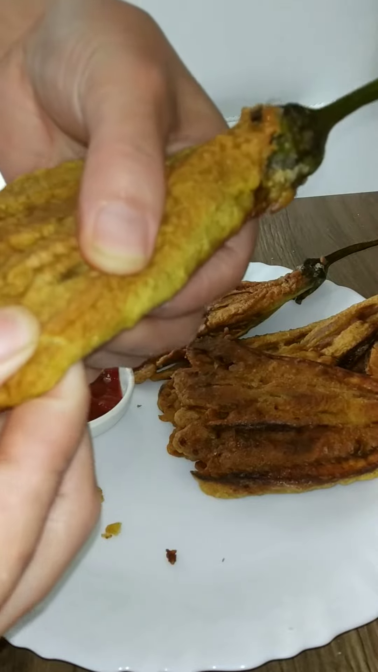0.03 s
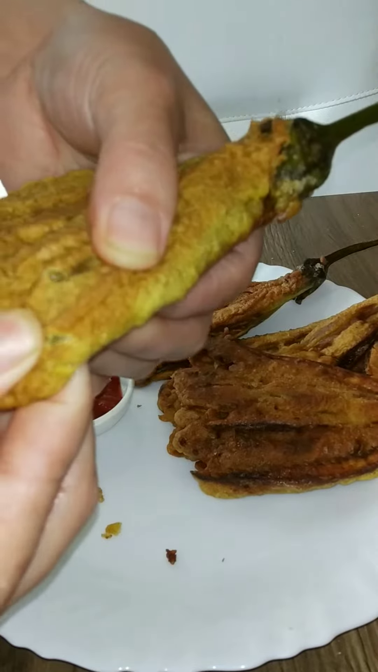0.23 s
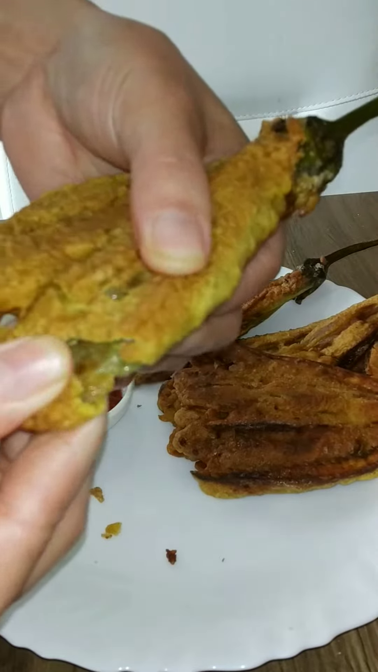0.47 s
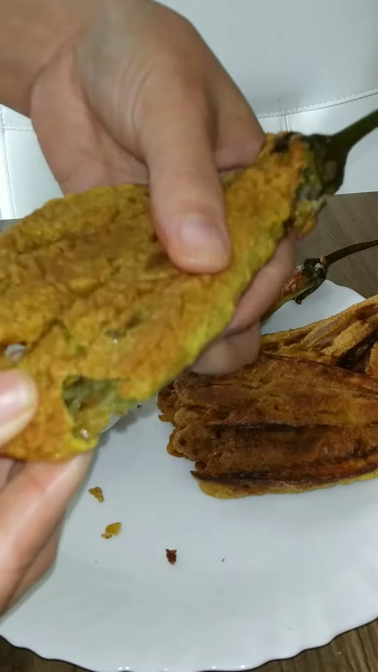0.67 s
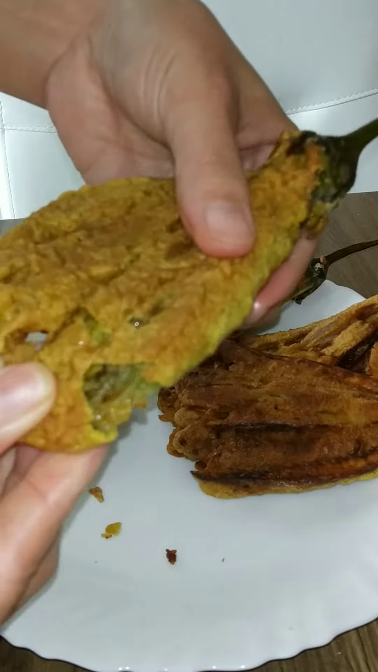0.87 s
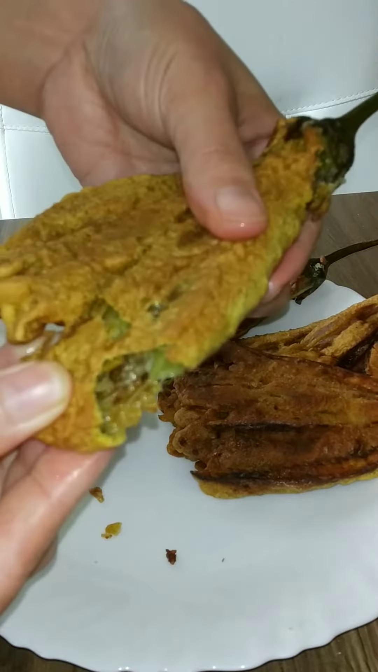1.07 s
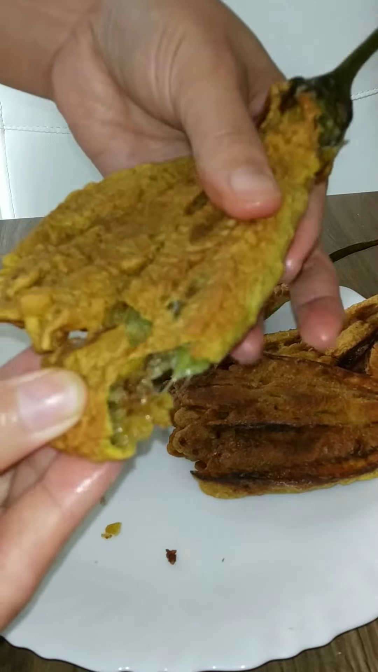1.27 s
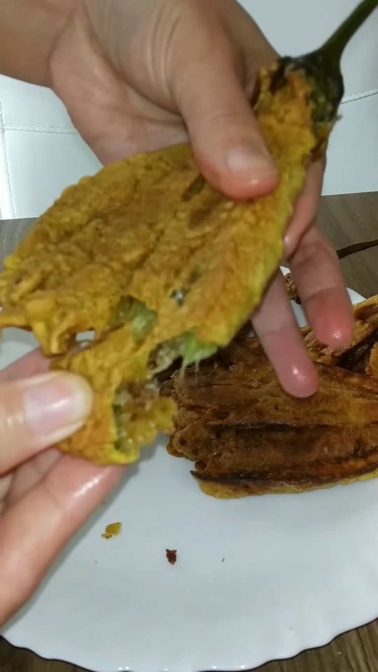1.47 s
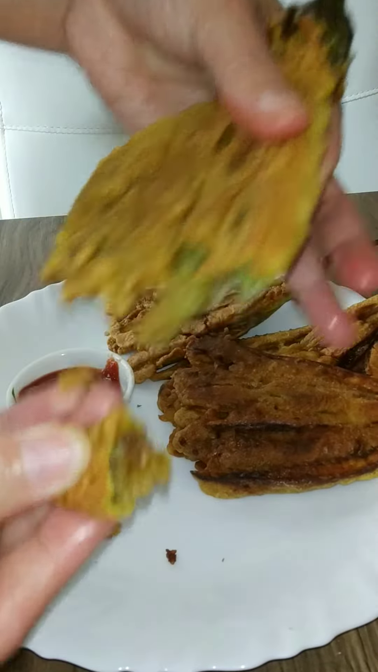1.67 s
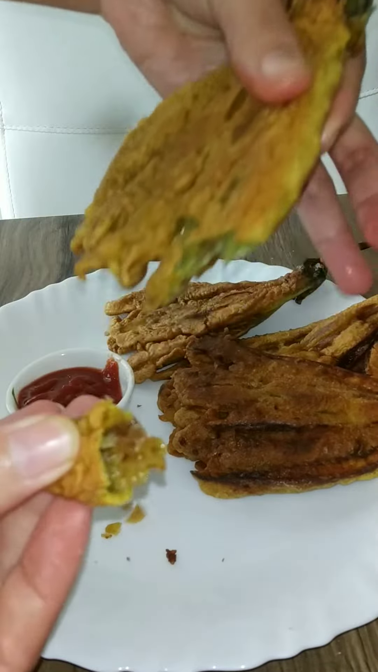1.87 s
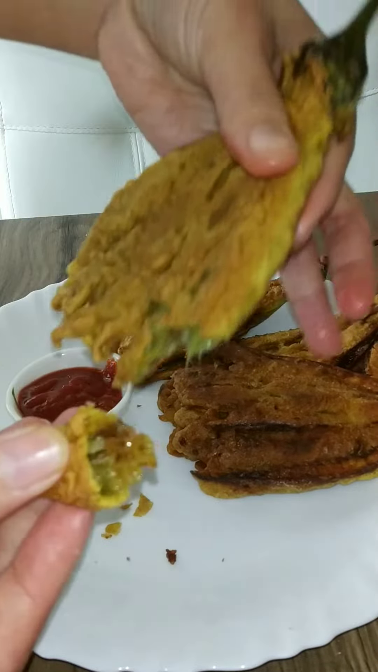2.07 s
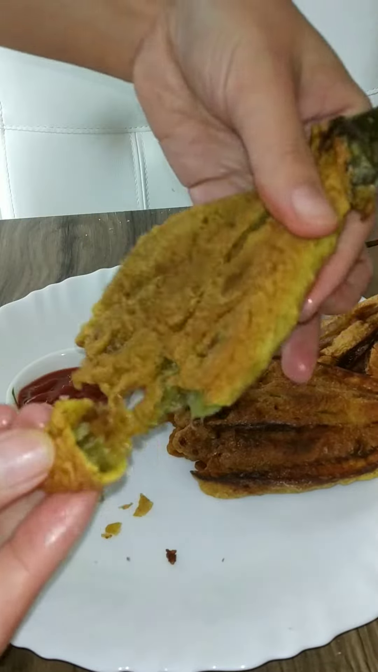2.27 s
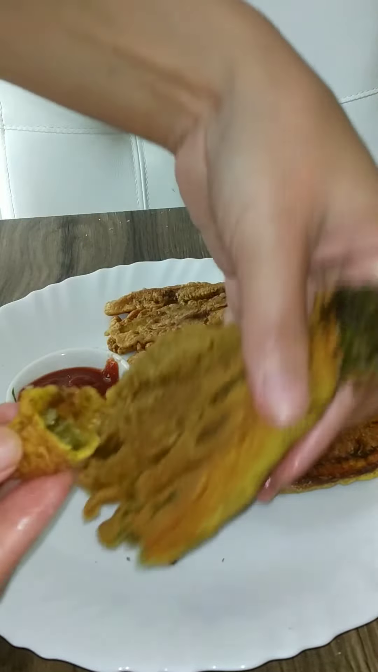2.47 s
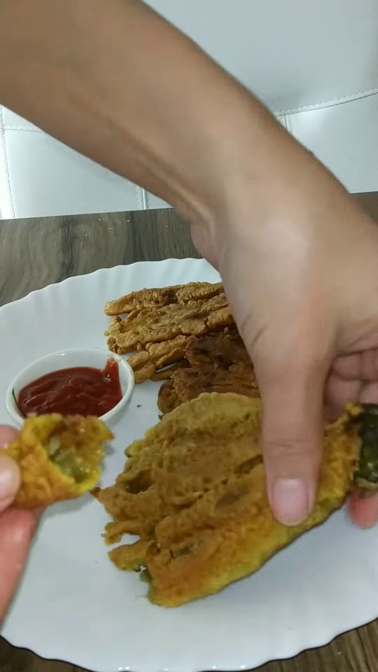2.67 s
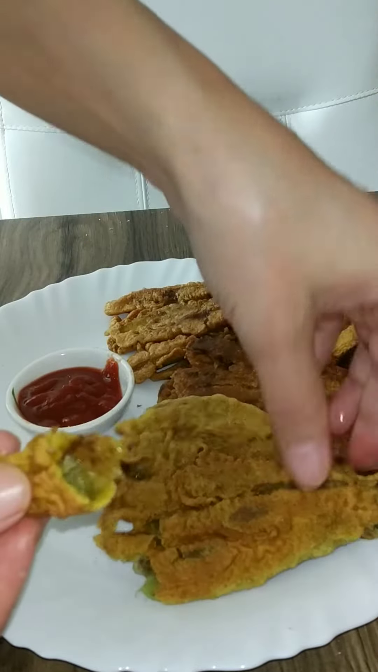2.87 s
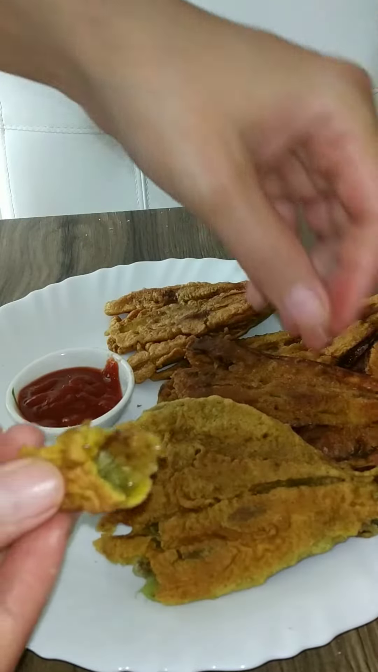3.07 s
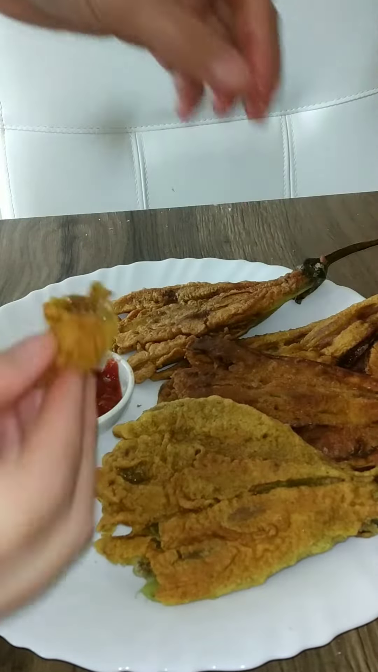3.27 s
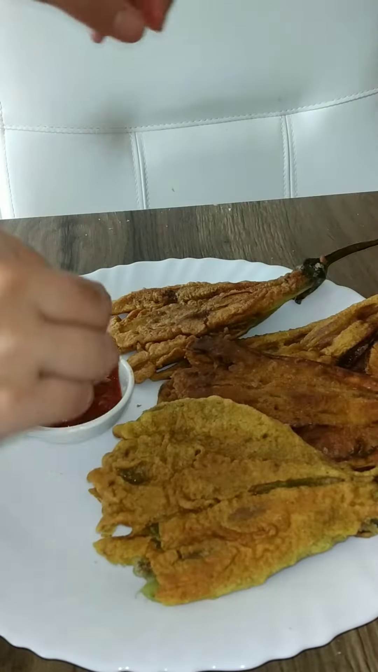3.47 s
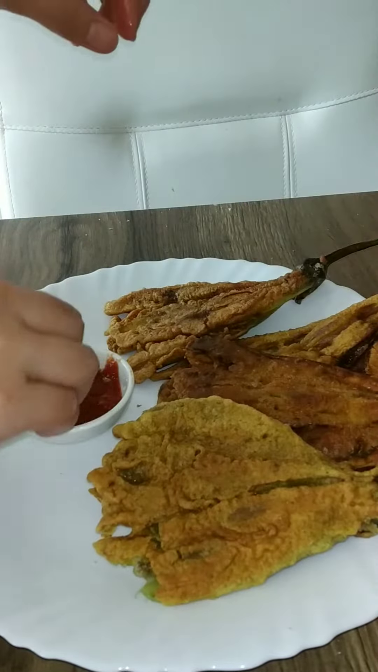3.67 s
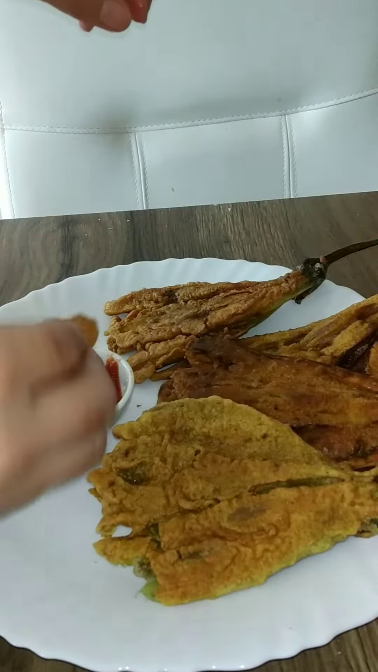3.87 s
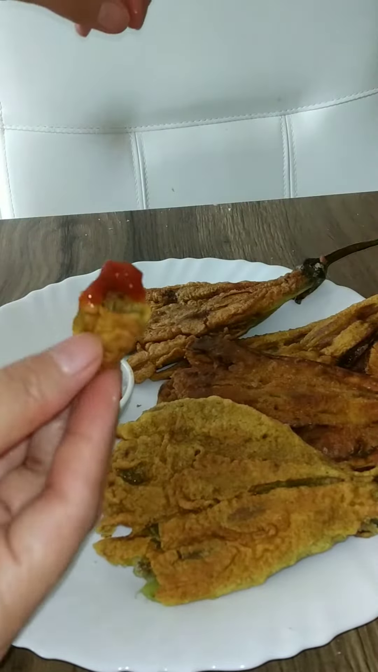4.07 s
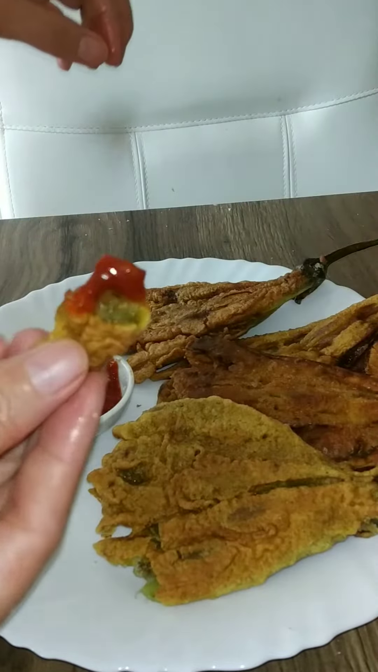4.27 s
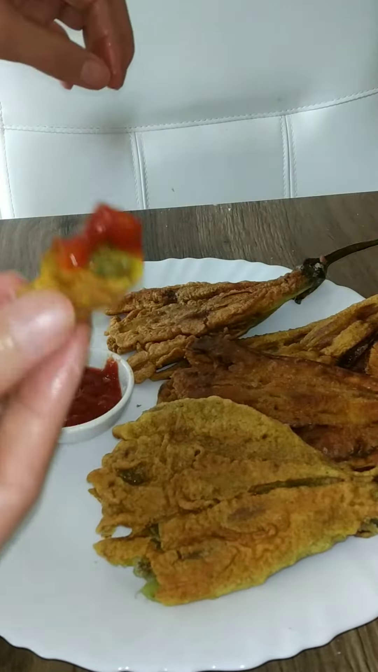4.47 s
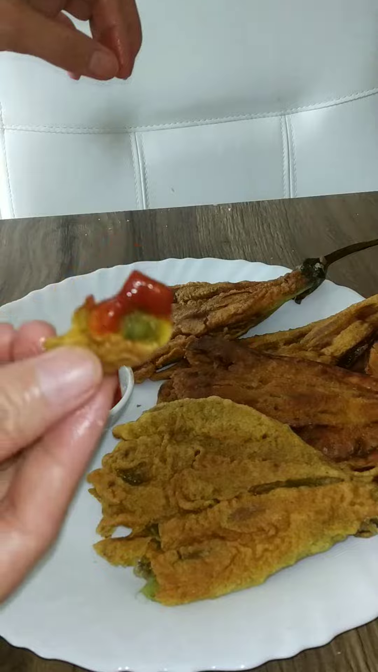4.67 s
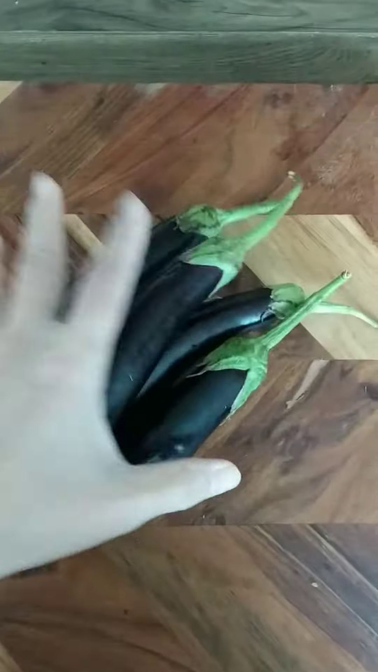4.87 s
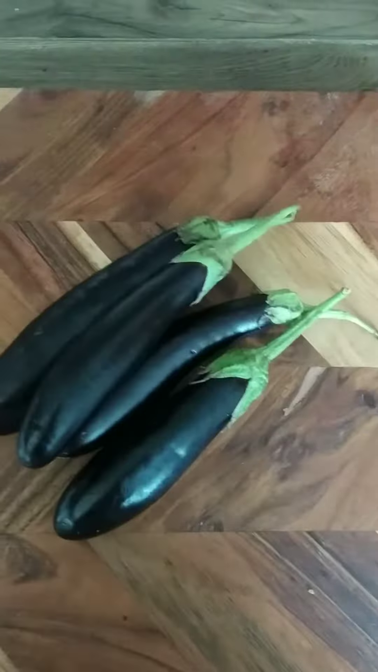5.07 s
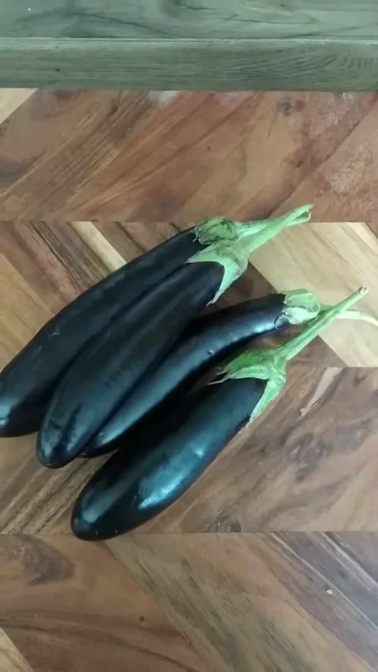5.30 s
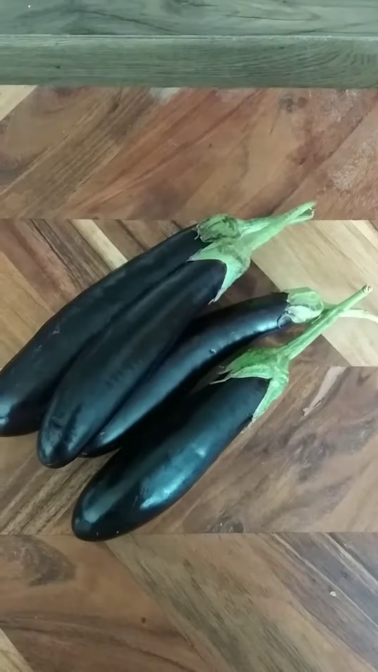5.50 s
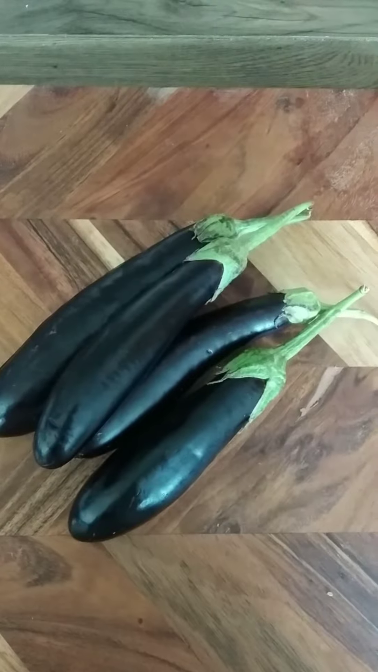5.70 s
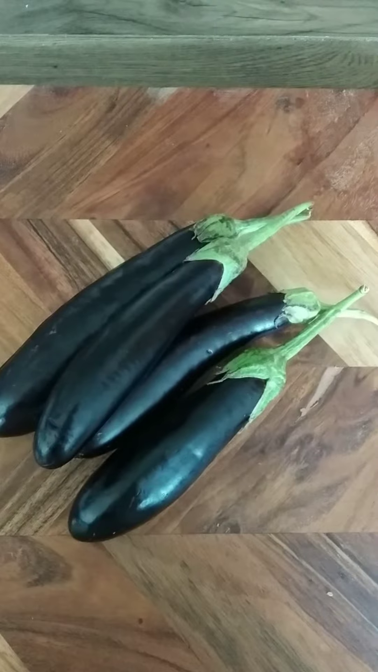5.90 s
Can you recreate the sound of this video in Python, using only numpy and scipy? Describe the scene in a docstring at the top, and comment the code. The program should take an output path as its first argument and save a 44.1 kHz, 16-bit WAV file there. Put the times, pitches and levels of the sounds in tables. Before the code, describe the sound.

Crispy fried food is torn by hand with small sharp crackles, then raw eggplants drop onto a wooden board with a loud knock.

```python
"""Fingers tear a batter-fried eggplant close to a phone: the crust breaks in sharp snaps over a rustle
of tiny fractures. Crumbs and the piece tick on a china plate, ringing its thin modes, and the piece is
laid down with soft thuds. Then raw eggplants drop on a wooden board, knocking and slapping as they
settle. A room hums below the microphone hiss."""
import sys
import numpy as np
from scipy import signal
from scipy.fft import rfft, irfft
from scipy.io import wavfile
from scipy.ndimage import uniform_filter1d

SR = 44100
rng = np.random.default_rng(int(sys.argv[2]) if len(sys.argv) > 2 else 0)


def generate_wav(signal):
    """Clip the signal to [-1, 1] and save it as 16-bit WAV at the path in sys.argv[1]."""
    frames = np.transpose(np.atleast_2d(signal))
    scaled = np.clip(frames, -1, 1) * 32767
    pcm = np.round(scaled).astype(np.int16)
    wavfile.write(sys.argv[1], SR, pcm)


N = 261954


def undb(db):
    """Decibels to gain."""
    return 10 ** (np.asarray(db) / 20)


def along(points, hz):
    """Read a curve of (hz, value) points on a log-frequency axis."""
    freqs, values = np.transpose(points)
    return np.interp(np.log(np.maximum(hz, 1)), np.log(freqs), values)


def colour(x, gain):
    """EQ by a gain that is a function of frequency."""
    n = x.shape[-1]
    return irfft(rfft(x) * gain(np.arange(n // 2 + 1) * SR / n), n)


def unit(x):
    """Scale to rms 1."""
    return x / np.sqrt(np.mean(x ** 2))


def add(out, start_s, piece):
    """Mix a stereo piece in at its start time."""
    i = int(start_s * SR)
    out[:, i:i + piece.shape[1]] += piece[:, :N - i]


def stereo_noise(n, correlation):
    """White noise, partly shared by left and right."""
    shared, apart = rng.standard_normal((2, n))
    return np.array([correlation * shared + np.sqrt(1 - correlation ** 2) * apart, shared])


def pan(db):
    """Left and right gains; positive db leans left."""
    return undb(np.array([[db], [-db]]) / 2)


def fade(t, t60):
    """Exponential decay, 60 dB down at t60."""
    return np.exp(-np.log(1000) * t / np.maximum(t60, .002))


def wander(rate_hz):
    """Slow random drift of rms 1."""
    hold = int(SR / rate_hz)
    steps = np.repeat(rng.standard_normal(N // hold + 1), hold)
    return unit(uniform_filter1d(uniform_filter1d(steps, hold), hold)[:N])


# Tone of the room hum: freq_hz, level_db
HUM_EQ = [(12, -39), (20, 2), (49, 1.5), (81, -11), (124, -10), (155, -13), (190, -4.5), (228, -16.5),
          (285, -12), (350, -20), (527, -19), (623, -25), (710, -20), (1130, -21), (1700, -38.5),
          (2210, -88), (3740, -120)]
# Stereo image of the hum: freq_hz, left_right_correlation
HUM_CORRELATION = [(60, 0.69), (130, 0.96), (290, 0.85), (640, 0.68), (1400, 0.077)]
# Level of the hum's upper band, which sinks after 4.6 s: time_s, level_db
UPPER_HUM_LEVEL = [(0, -53), (4.6, -53.5), (5.4, -57.5), (5.94, -58)]


def room_hum():
    """Low room noise, nearly mono in the bass; the rumble and the upper band waver separately."""
    t = np.arange(N) / SR
    shared, apart = rng.standard_normal((2, N))
    correlation = lambda f: along(HUM_CORRELATION, f)
    left = colour(shared, correlation) + colour(apart, lambda f: np.sqrt(1 - correlation(f) ** 2))
    hum = colour(np.array([left, shared]), lambda f: undb(along(HUM_EQ, f)))
    hum /= colour(hum, lambda f: (f > 30) & (f < 120)).std()  # the bass sets the level
    low = colour(hum, lambda f: 1 / (1 + (f / 400) ** 2))
    rumble = low * undb(-55 + 1.5 * wander(rate_hz=5))
    upper_db = np.interp(t, *np.transpose(UPPER_HUM_LEVEL))
    upper = (hum - low) * undb(upper_db + .6 * wander(rate_hz=6))
    return rumble + upper


def flesh(f):
    """Gain of the soft body under the crust: a broad resonance near 2 kHz."""
    bump = np.exp(-(np.log2(np.maximum(f, 1) / 2000) / 1.03) ** 2)
    return bump * (f / 1000) ** 4 / (1 + (f / 1000) ** 4)


# Tone of breaking crust, also used by the cracks and ticks: freq_hz, level_db
CRUST_EQ = [(800, 7), (1500, -16.5), (3000, -13.5), (5000, -6), (8000, -3), (12000, -2.5), (16000, -5)]
# Swells of crumbling; the last two are stems brushing the board:
# peak_s, level_db, t60_s, treble_tilt_db, body_db
RUSTLE_SWELLS = [(0.02, -48, 0.34, 2, -24), (0.255, -68, 0.21, 5, -15), (0.345, -56, 0.52, 19, -22),
                 (0.535, -49.5, 0.16, 10, -11), (0.68, -55.5, 0.14, 7, -3), (1.245, -61.5, 0.49, 11, -11),
                 (1.633, -44.5, 0.21, 0, -18), (1.8, -58.5, 0.87, 0, -9), (2.619, -57, 0.17, -18, -2),
                 (2.712, -52.5, 0.4, -5, -8), (2.885, -60, 0.32, -14, 3), (2.93, -61, 0.53, 3, -26),
                 (4.745, -57.5, 0.55, 12, -5), (4.9, -56, 0.15, 3, 1.5)]


def crust_rustle():
    """Dense tiny fractures of uneven size, dull or bright by the swell, with the soft body's scrape."""
    t = np.arange(N) / SR
    fractures_per_s, rise_to_fall = 1500, 0.68
    sizes = (rng.random(N) < fractures_per_s / SR) * undb(np.minimum(22 * rng.exponential(size=N), 12))
    energy = signal.lfilter([1], [1, -fade(2 / SR, t60=0.025)], sizes ** 2)  # a short tail on each
    grains = stereo_noise(N, correlation=0.12) * np.sqrt(energy)
    crunch = unit(colour(grains, lambda f: undb(along(CRUST_EQ, f))))
    dull = colour(crunch, lambda f: 1 / (1 + (f / 7000) ** 4))
    bright = crunch - dull
    body = unit(colour(grains, flesh))

    def blend(tilt_db, body_db):
        return dull * undb(-tilt_db / 2) + bright * undb(tilt_db / 2) + body * undb(body_db)

    pulling = (1 - np.tanh((t - 1.6) / 0.066)) / 2  # a faint bed while the hands pull, until 1.6 s
    out = undb(-71) * blend(tilt_db=11, body_db=-6) * pulling
    for peak_s, level_db, t60, tilt_db, body_db in RUSTLE_SWELLS:
        swell = fade(abs(t - peak_s), np.where(t < peak_s, rise_to_fall * t60, t60))
        out += undb(level_db) * swell * blend(tilt_db, body_db)
    return out * pan(-1.3)


# Snaps of the crust; the last is a dry stem: start_s, level_db, flake_hz, pan_db, body_db
CRACK_CUES = [(0.0207, -25, 12000, -4.5, 0), (0.0332, -31.5, 7050, -1, -5), (0.142, -46.5, 10800, 6, -25),
              (0.163, -49, 7540, -1, -18), (0.2425, -44, 14300, 9, -33), (0.2515, -40.5, 5830, -4, -5),
              (0.269, -42, 12700, -4, -9), (0.281, -52, 12800, 5, -10), (0.2966, -50, 5950, 3, 6),
              (0.313, -45, 7810, -2, -21), (0.318, -39, 12300, 6, -28), (0.3234, -33, 8340, 0, -32),
              (0.345, -38, 10400, -11, -10), (0.3543, -27, 12100, 0.5, -0.5), (0.373, -44, 12000, 7, 5),
              (0.5106, -40, 10600, -12, -30), (0.5127, -28, 10600, -13.5, -24),
              (0.5263, -36.5, 12800, -8, -15), (0.5324, -40, 9440, -12, -12), (0.547, -43, 10800, -15, -2),
              (0.681, -47.5, 12200, 3, -3), (0.6868, -48, 11400, -21, -25), (0.6996, -42, 9000, -3, -1),
              (0.9342, -47.5, 8100, -2, 4), (0.953, -51.5, 10500, -8, -20), (0.9924, -25.5, 12100, -3, -30),
              (1.0218, -34.5, 15000, -3, -7), (1.0249, -23.5, 13500, -5, -9), (1.0333, -33, 11400, -2, -11),
              (1.0937, -41.5, 11800, -6, -12), (1.187, -46.5, 14700, -2.5, -2),
              (1.2293, -33.5, 11900, -2, -17), (1.234, -38, 12800, -6, -12), (1.263, -43, 11800, 1, -12),
              (1.288, -35, 12700, 0, -19), (1.291, -35.5, 12600, -9, -30), (1.518, -48, 13000, -6, -7),
              (1.5403, -47.5, 12500, -5, -2), (1.6225, -40.5, 13700, -4, 0), (1.6311, -43.5, 7900, -3, -5),
              (1.636, -45.5, 4220, -9, -15), (2.5569, -44.5, 12800, -6, -4), (2.6, -43, 14000, -4, -3),
              (2.61, -49, 9900, 1, -6), (2.6223, -50, 4160, 2, 14.5), (2.7173, -46, 4170, -9, -15),
              (2.831, -43, 9200, -1, -9), (5.036, -47.5, 5240, 2, 2)]


def crust_cracks():
    """Each fracture is a sharp snap with a ragged trail; it rings the freed flake and the soft body."""
    out, t = np.zeros((2, N)), np.arange(4096) / SR
    lead_s = 256 / SR
    attack = np.exp(np.minimum(t - lead_s, 0) / .0005)
    since_break = np.maximum(t - lead_s, 0)
    snap, trail = fade(since_break, t60=0.0049), undb(-8.5) * fade(since_break, t60=0.034)
    hollow = lambda f: undb(8) * np.exp(-((f - 1200) / 150) ** 2)  # the cavity under the crust
    low_cut = lambda f: f ** 4 / (f ** 4 + 970.0 ** 4)
    for start_s, level_db, flake_hz, pan_db, body_db in CRACK_CUES:
        burst = stereo_noise(len(t), correlation=0.49) * attack * (snap + trail)
        burst[:, int(lead_s * SR)] += undb(13.5)  # the instant of the break
        peak = lambda f: 0.9 / (1 + ((f - flake_hz) / (0.19 * flake_hz)) ** 2)
        flake = lambda f: undb(along(CRUST_EQ, f)) * (0.31 + peak(f))
        flake_rms = np.sqrt(np.mean(flake(np.linspace(3000, 16000, 50)) ** 2))
        body = lambda f: undb(body_db) * (flesh(f) + hollow(f))
        crack = colour(burst, lambda f: (flake(f) / flake_rms + body(f)) * low_cut(f))
        add(out, start_s - lead_s, crack * undb(level_db) * pan(pan_db))
    return out


# Ring of the china: pitch_hz, rim_level_db, t60_s, middle_change_db
CHINA_MODES = [(1960, -2, 0.021, 2), (2870, -14.5, 0.17, -9), (4170, -23, 0.13, 17.5),
               (4500, -20, 0.072, 3), (5250, 5, 0.048, -15), (6000, -14, 0.08, 3), (6630, -9, 0.051, -1),
               (7480, -1.5, 0.074, -12), (7530, -18, 0.15, 6), (8070, -7, 0.089, -2), (8460, -15, 0.13, 0),
               (9330, -4, 0.072, -5), (9840, -3, 0.11, -2), (10400, -17, 0.065, 0), (10830, -2, 0.071, 6),
               (11510, -15, 0.1, 4), (12010, -12, 0.13, 7), (12300, -13, 0.08, 13), (13290, -1.5, .07, -12),
               (14290, -14, .07, 8), (14670, -7, .06, -10), (15100, -16, .08, 4)]
# Hits on the plate: hit_s, level_db, pan_db, place (0 rim, 1 middle)
TICK_CUES = [(1.76, -47, -5, 0.9), (1.807, -34, 0, 0.85), (2.8968, -22, -1.5, 0.05)]


def plate_ticks():
    """Hard crust strikes china: a crack, then the round plate's modes, in close pairs that beat."""
    out, t = np.zeros((2, N)), np.arange(SR // 3) / SR
    twin_ratio = 1.0072
    attack = np.minimum(t / 0.0039, 1)
    for hit_s, level_db, pan_db, place in TICK_CUES:
        ring = 0
        for hz, rim_db, t60, middle_db in CHINA_MODES:
            phase = rng.uniform(0, 2 * np.pi) + 0.83 * rng.standard_normal((2, 1))
            spread_db = 1.4 * rng.standard_normal((2, 1))
            mode = np.sin(2 * np.pi * hz * t + phase)
            twin = 0.66 * np.sin(2 * np.pi * hz * twin_ratio * t + 2 * phase)
            ring += undb(rim_db + place * middle_db + spread_db) * fade(t, t60) * (mode + twin)
        noise = stereo_noise(len(t), correlation=0.067)
        crack = colour(noise, lambda f: undb(0.23 * along(CRUST_EQ, f))) * fade(t, t60=0.025)
        tick = (undb(-10.5) * ring + undb(1.5) * crack) * attack
        add(out, hit_s - .002, tick * undb(level_db) * pan(pan_db))
    return out


# Low ring of the plate on the table: pitch_hz, level_db, t60_s
THUD_MODES = [(54.7, -2, 0.14), (104, 0, 0.093), (385, 6, 0.031), (440, 3, 0.017)]
# The piece is laid down: start_s, level_db, bass_boost_db
THUD_CUES = [(2.913, -50.5, 5.5), (2.949, -45.5, 4), (2.982, -38.5, -2)]


def plate_thuds():
    """The piece lands softly and stirs only the low modes of the plate on the table."""
    out, t = np.zeros((2, N)), np.arange(SR // 3) / SR
    attack = np.minimum(t / 0.0013, 1)
    for start_s, level_db, bass_db in THUD_CUES:
        thud = sum(undb(mode_db + bass_db * (hz < 200)) * np.sin(2 * np.pi * hz * t) * fade(t, t60)
                   for hz, mode_db, t60 in THUD_MODES)
        add(out, start_s, -undb(level_db) * thud * attack * pan(0))
    return out


# Ring of the board and table; the lowest mode is a deep shudder of the camera stand:
# pitch_hz, level_db, t60_s, half_waves_across
KNOCK_MODES = [(32.8, -17.5, 0.45, 1.5), (77, 1.5, 0.11, 2.5), (116, -24, 0.075, 2.5), (140, -5, 0.1, 2),
               (201, 1.5, 0.036, 2.5), (270.3, 3, 0.15, 2.5), (373.7, -11.5, 0.16, 6),
               (421, -2.5, 0.053, 4), (532, 0, 0.05, 2.5), (686, -3.5, 0.022, 4), (851, 2.5, 0.027, 4.5),
               (990, -12, 0.032, 6), (1120, -6.5, 0.037, 8), (1254, -1.5, 0.022, 8.5),
               (1360, -11, 0.024, 2.5), (1730, -9, 0.02, 8), (2310, -18, 0.022, 6)]
# Eggplants land and settle:
# start_s, level_db, contact_s, slap_db, place (0 to 1 across), signed_pulse_gain, fruit_hz, fruit_db
DROP_CUES = [(4.7492, -11.5, 0.0013, -9, 0.15, -0.66, 480, -26),
             (4.7537, -8.5, 0.00049, -2.5, 0.24, -0.98, 955, -9),
             (4.7613, -8.5, 0.00066, -2.5, 0.64, 0.38, 869, 0),
             (4.7787, -24, 0.00093, -24, 0.27, -0.47, 603, -14),
             (4.795, -15.5, 0.00074, -15, 0.66, 0.38, 1086, 2),
             (4.803, -12.5, 0.0005, -17, 0.2, 0.9, 870, -5.5),
             (4.8203, -23, 0.0011, -6.5, 0.17, -0.95, 614, 3),
             (4.8232, -29.5, 0.00067, -20, 0.32, 0.95, 1180, 6),
             (4.85, -20, 0.0014, -17, 0.21, 0.73, 620, -6),
             (4.873, -28, 0.0015, -11, 0.13, 0.094, 596, -13),
             (5.182, -29.5, 0.00065, -3.5, 0.88, 0.56, 1330, -0.5),
             (5.2031, -44, 0.00032, 1, 0.8, 0.73, 1420, 1.5),
             (5.281, -44.5, 0.002, -30, 0.25, 0.1, 357, 5.5),
             (5.36, -49, 0.002, -30, 0.24, -0.12, 350, 6.5), (5.44, -49, 0.0017, -30, 0.23, 0.28, 400, 7),
             (5.53, -42.5, 0.0013, -30, 0.29, 0.1, 330, 1.5),
             (5.586, -43, 0.0025, -30, 0.3, 0.84, 394, 7.5), (5.698, -48, 0.0018, -28, 0.2, 0.28, 370, 9.5)]


def eggplant_drops():
    """A half-sine push sends out a pulse and rings board, stand and fruit; the skin slaps with a hiss."""
    out, t = np.zeros((2, N)), np.arange(SR // 2) / SR
    low_cut = signal.butter(2, 80, "high", fs=SR, output="sos")  # a small contact radiates no deep bass
    skin_eq = lambda f: (f / 1500) / (1 + (f / 1500) ** 2.1)
    for start_s, level_db, contact_s, slap_db, place, pulse_gain, fruit_hz, fruit_db in DROP_CUES:
        modes = sum(undb(db) * np.cos(np.pi * waves * place) * np.sin(2 * np.pi * hz * t) * fade(t, t60)
                    for hz, db, t60, waves in KNOCK_MODES)
        fruit = np.sin(2 * np.pi * fruit_hz * t) * fade(t, t60=0.022)
        ring = undb(-7) * modes + undb(fruit_db) * fruit
        push = np.sin(np.pi * np.clip(t / contact_s, 0, 1))
        knock = -signal.fftconvolve(ring, push[:400] / push.sum())[:len(t)]  # longer contact is duller
        pulse = pulse_gain * signal.sosfilt(low_cut, push)
        slap = colour(stereo_noise(len(t), correlation=0.63), skin_eq) * fade(t, t60=0.058)
        add(out, start_s, undb(level_db) * (pulse + knock + undb(slap_db) * slap))
    return out


def in_room(source, left_lag_s, reverb_db, t60=0.37):
    """Direct sound, later at the left port, plus a diffuse tail, thin in the bass and dulling away."""
    t = np.arange(SR // 2) / SR
    noise = colour(stereo_noise(len(t), correlation=0.27), lambda f: f / (f + 400))
    noise *= t > .004  # pre-delay
    lows = colour(noise, lambda f: 1 / (1 + (f / 2500) ** 2))
    tail = lows * fade(t, t60) + undb(1.5) * (noise - lows) * fade(t, 0.65 * t60)
    tail /= np.sqrt(np.sum(tail ** 2, axis=1, keepdims=True))
    reverb = signal.fftconvolve(source.mean(0, keepdims=True), tail, axes=1)[:, :N]
    left = colour(source[0], lambda f: np.exp(-2j * np.pi * f * left_lag_s))
    return np.array([left, source[1]]) + undb(reverb_db) * reverb


def scene():
    """The fried piece and its plate, then the raw eggplants, all in one humming room."""
    food = crust_cracks() + crust_rustle() + plate_ticks() + plate_thuds()
    drops = eggplant_drops()
    return (in_room(food, left_lag_s=0.0002635, reverb_db=-9.5)
            + in_room(drops, left_lag_s=0.00008, reverb_db=-8.5) + room_hum())


# Tone of the left microphone port against the right: freq_hz, left_minus_right_db
PORT_EQ = [(200, 0), (400, 1), (700, 5), (1300, 7.5), (2400, 3), (4000, -3), (8000, -5.5), (12000, 1)]
# Tone of the capsule hiss: freq_hz, level_db
HISS_EQ = [(940, -9.5), (1600, -1), (2400, -0.5), (2880, -2.5), (4490, -4), (14500, -4.5), (16000, -7)]


def record(dry):
    """Each microphone port has its own colour and each capsule hisses; the top is cut steeply."""
    port = lambda f: undb(along(PORT_EQ, f) / 2)
    heard = np.array([colour(dry[0], port), colour(dry[1], lambda f: 1 / port(f))])
    hiss = unit(colour(rng.standard_normal(dry.shape), lambda f: undb(along(HISS_EQ, f))))
    high_cut = signal.ellip(10, .2, 70, 15900, fs=SR, output="sos")
    return signal.sosfilt(high_cut, heard + undb(-63.5) * hiss)


dry = scene()
out = record(dry)
generate_wav(out)
```